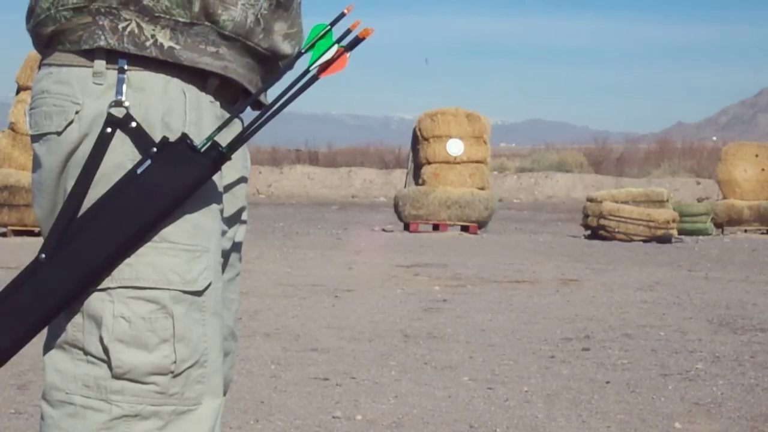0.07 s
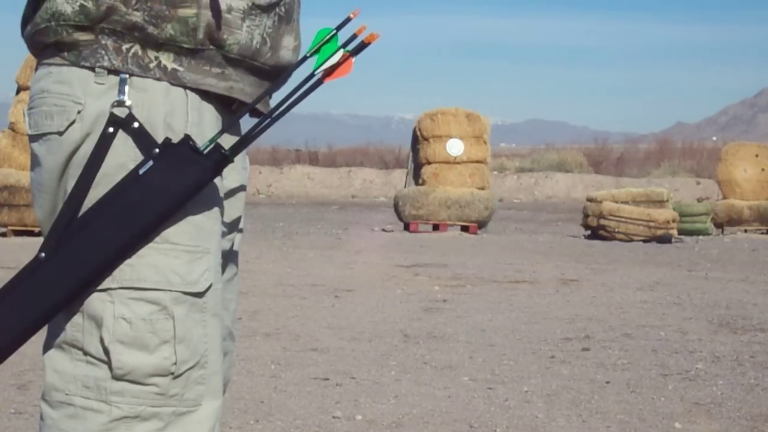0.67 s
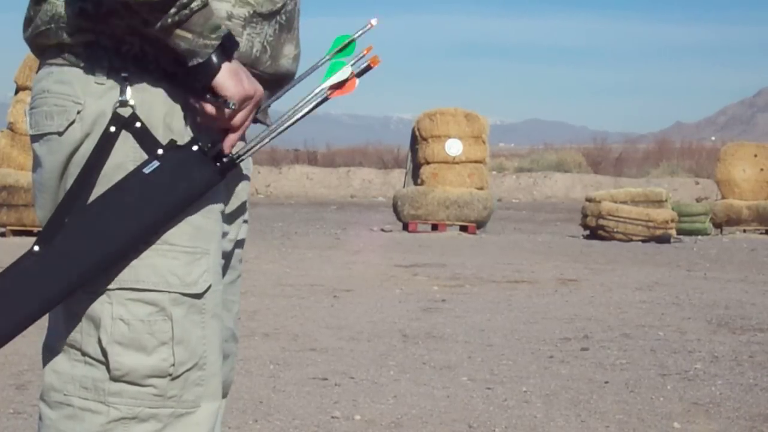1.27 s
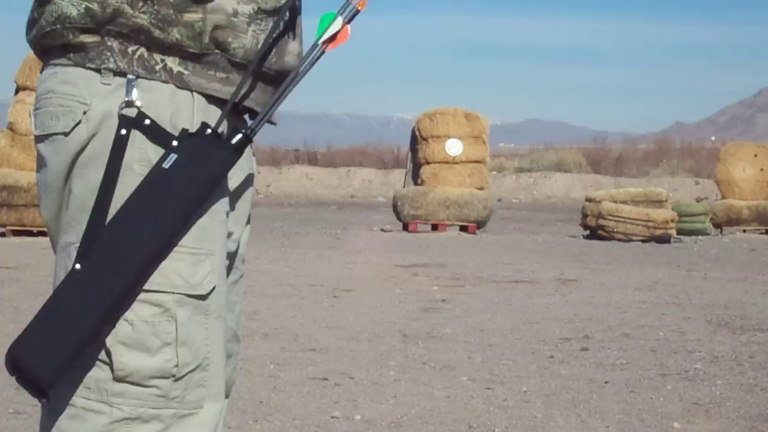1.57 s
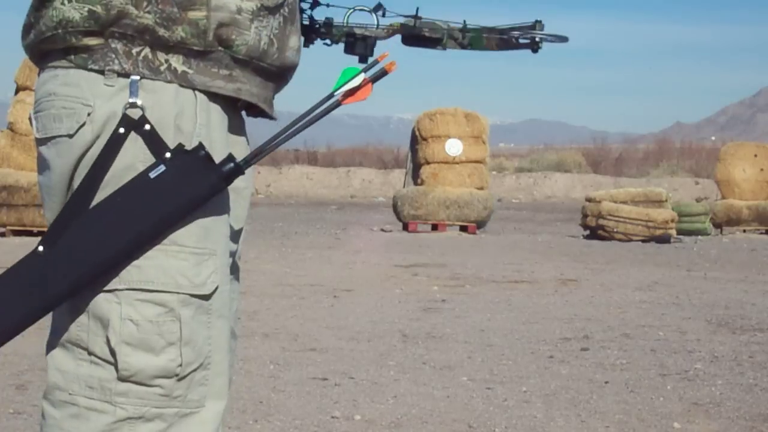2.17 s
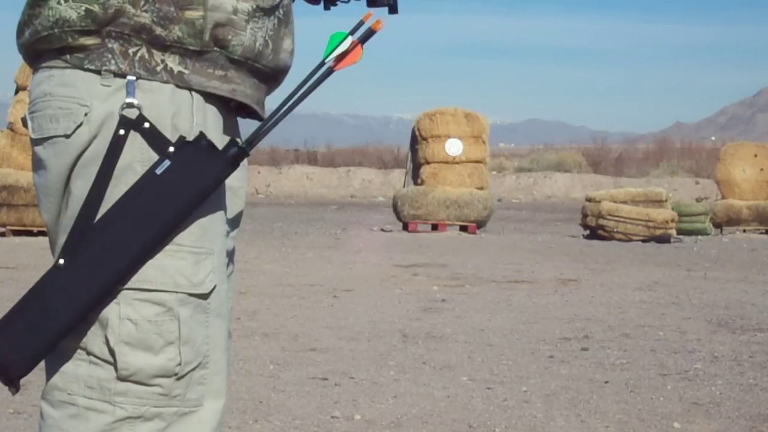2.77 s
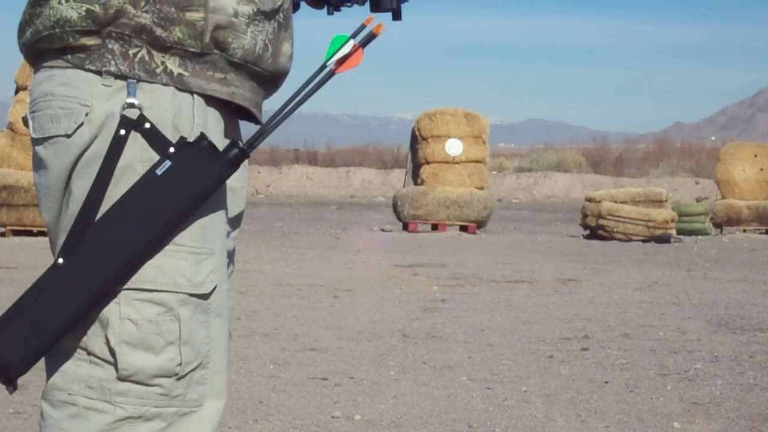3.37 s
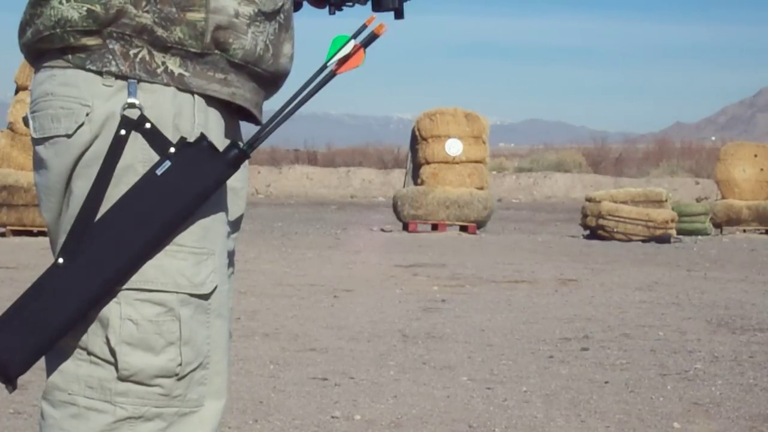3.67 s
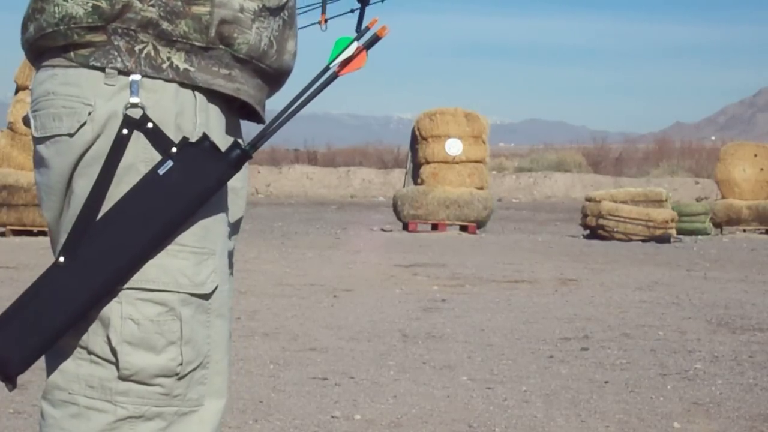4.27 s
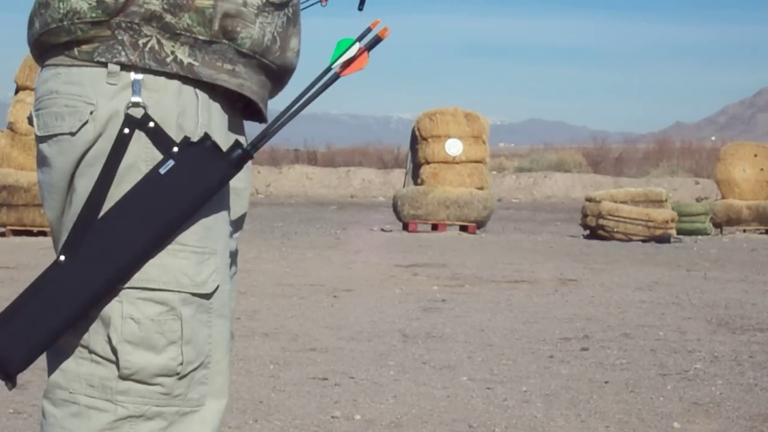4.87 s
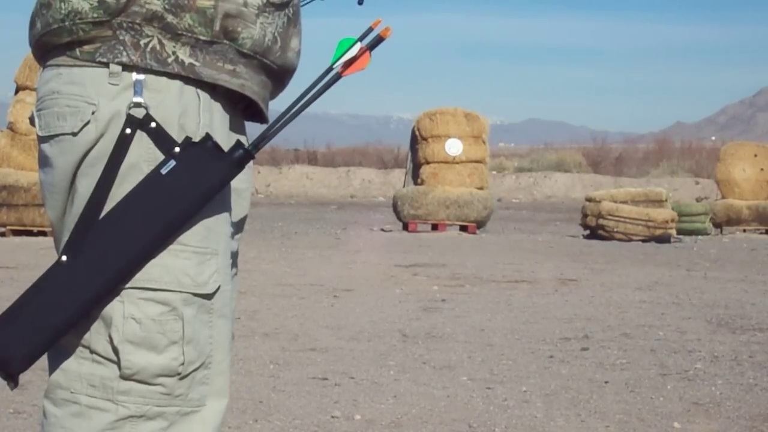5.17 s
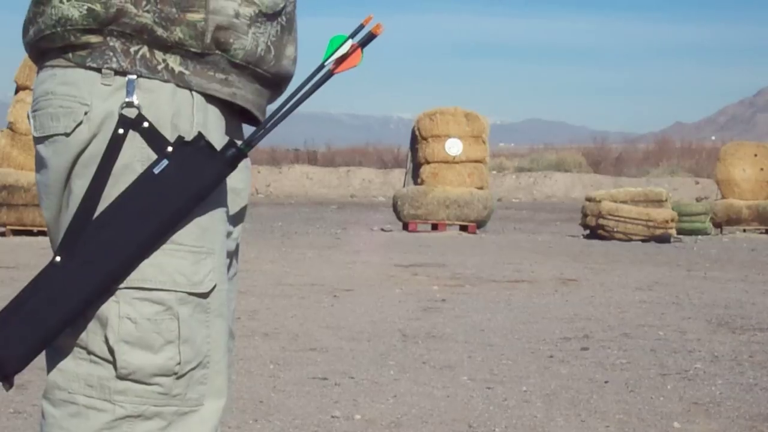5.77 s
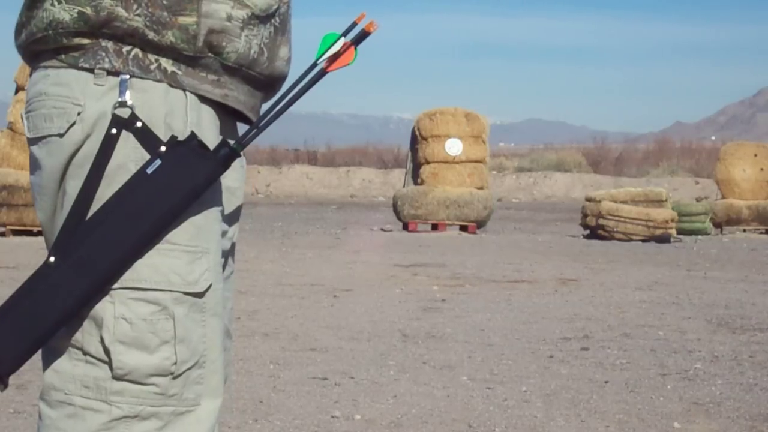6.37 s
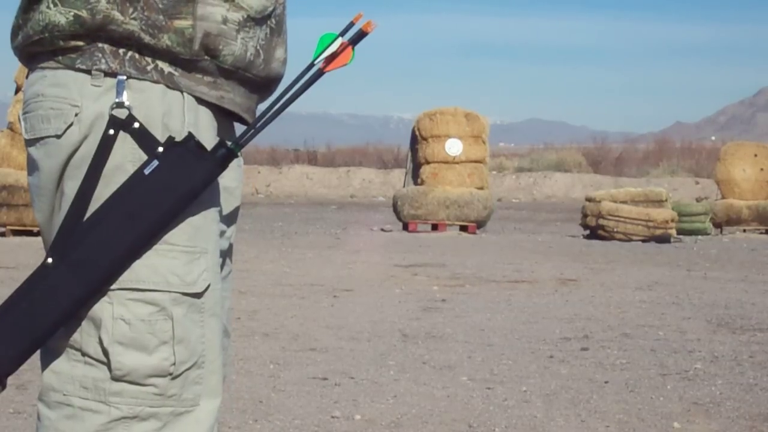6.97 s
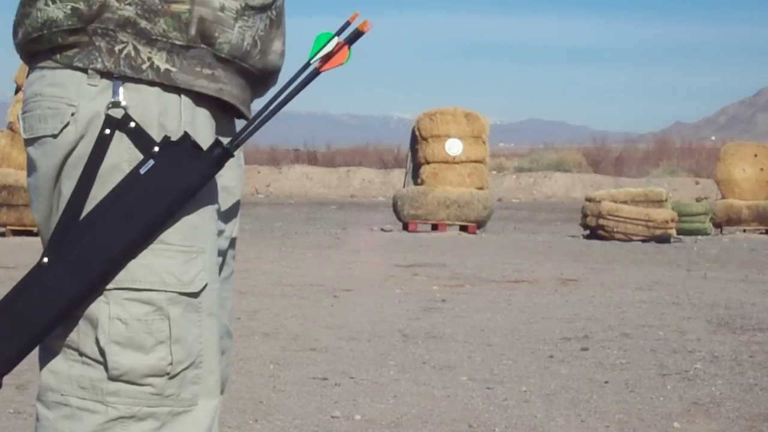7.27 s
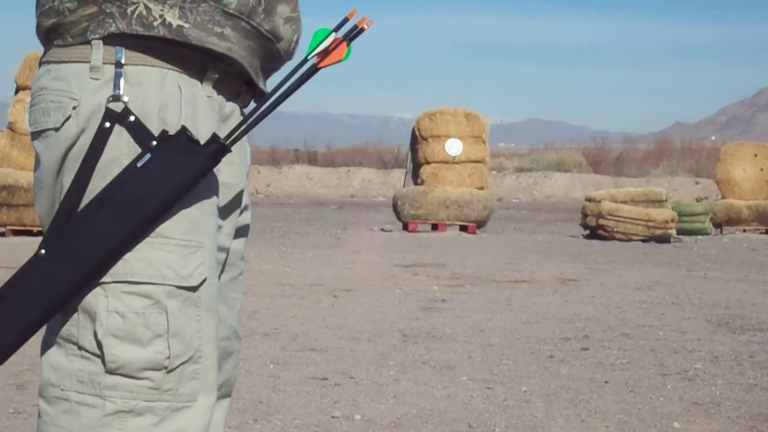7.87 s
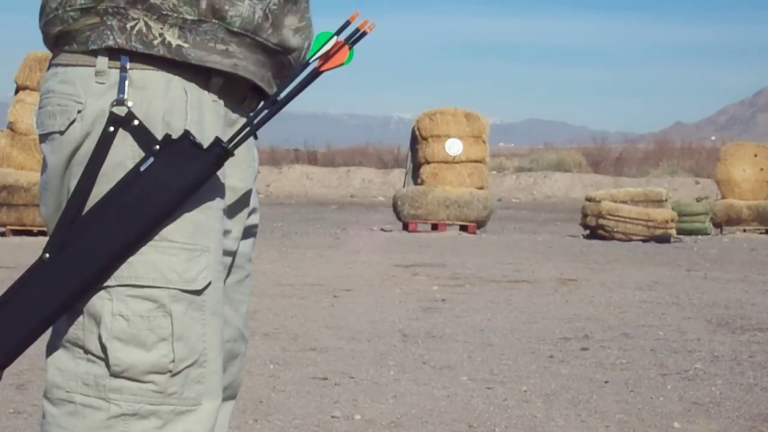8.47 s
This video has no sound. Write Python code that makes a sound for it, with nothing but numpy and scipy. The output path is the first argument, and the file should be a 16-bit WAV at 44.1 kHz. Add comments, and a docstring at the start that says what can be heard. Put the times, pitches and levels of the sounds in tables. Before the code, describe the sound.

Outdoor wind rumbles on the microphone throughout, stronger on the left, with hollow gusts, a faint whistle and a light hiss. At 0.4 seconds a catch snaps shut close by, slightly to the right: one sharp crack, the loudest sound. Two faint cloth swishes come around 1 second. From 1.3 to 1.7 seconds an arrow slides out of a quiver with a soft scrape and tiny squeaks. The other shafts clack brightly together at 1.7 seconds and settle with a couple of lighter knocks. At 4 seconds there is a small, bright plastic click as the arrow is clipped onto the bowstring, followed by fainter scattered ticks until about 5 seconds. Wind buffets the microphone with low thumps around 4 to 4.4 and 5 to 5.5 seconds. After that only wind remains, bumping near 7 seconds and gusting at about 7.5 and 8.3 seconds.

```python
"""An open, windy archery range. A piece of gear snaps shut, then an arrow is drawn from a hip quiver:
it scrapes past the other arrows and lets them clack together. Small ticks follow as it is nocked
(clipped onto the bowstring). All along, the wind rumbles, rushes hollowly in gusts and buffets the
microphone's two openings (ports), mainly the left one."""
import sys
import numpy as np
from scipy import signal
from scipy.fft import rfft, irfft, next_fast_len
from scipy.io import wavfile
from scipy.ndimage import uniform_filter1d, map_coordinates

SR = 44100
rng = np.random.default_rng(int(sys.argv[2]) if len(sys.argv) > 2 else 0)


def int16_out(signal):
    """Quantize to a 16-bit WAV file."""
    q = np.round(np.clip(np.atleast_2d(signal).T, -1, 1) * 32767)
    wavfile.write(sys.argv[1], SR, q.astype(np.int16))


N = 376173
TOP_HZ = 8750  # the highest frequency the microphone passes
# the low roar of moving air: f/Hz, level/dB
ROAR_SPECTRUM = [(50, -33.5), (90, -1.5), (150, 2), (210, 0.5), (260, -1), (330, -6.5), (400, -13.5),
                 (550, -16.5), (900, -49.5), (1500, -90.5)]


def amp(db):
    """Turn decibels into a gain to multiply by."""
    return 10 ** (np.asarray(db) / 20)


def unit(x):
    """Scale a signal to an average strength (rms) of 1."""
    return x / np.sqrt(np.mean(x ** 2) + 1e-20)


def energy_one(x):
    """Scale a short sound to a total energy of 1."""
    return x / np.linalg.norm(x)


def along(points, hz):
    """Read between (frequency, value) points, on a log frequency axis."""
    freqs, values = np.transpose(points)
    return np.interp(np.log(hz + 1), np.log(freqs + 1), values)


def curve(points):
    """Join (time, value) points with straight lines, one value per sample."""
    return np.interp(np.arange(N) / SR, *np.transpose(points))


def wobble(rate):
    """A smooth random curve through `rate` new values a second."""
    values = rng.standard_normal(int(N * rate / SR) + 4)
    return map_coordinates(values, [np.arange(N) * rate / SR])


def swell(s, length):
    """A smooth rise and fall around time s, down to about a third at the ends of its length."""
    distance = 2 * (np.arange(N) / SR - s) / length
    return np.exp(-np.minimum(distance ** 2, 50))


def filtered(x, response):
    """Give each frequency in x the gain response(hz)."""
    size = x.shape[-1]
    padded = next_fast_len(size + 8192)
    return irfft(rfft(x, padded) * response(np.fft.rfftfreq(padded, 1 / SR)), padded)[..., :size]


def coloured(x, spectrum):
    """Shape x with a spectrum (a level for each frequency), then scale it to rms 1."""
    return unit(filtered(x, lambda hz: amp(along(spectrum, hz))))


def pair(apart_db):
    """Left and right white noise: a shared part, plus a difference at apart_db against it."""
    mid, side = rng.standard_normal((2, N))
    return unit(np.array([mid + amp(apart_db) * side, mid - amp(apart_db) * side]))


def panned(lead_db):
    """Left and right gains that average 1, the left louder by lead_db."""
    gains = amp(np.array([[.5], [-.5]]) * lead_db)
    return gains / gains.mean(axis=0)


def add(track, s, sound):
    """Mix a sound into the track at s seconds."""
    part = track[round(s * SR):][:len(sound)]
    part += sound[:len(part)]


def pulse(spectrum, size=2048):
    """The sharpest click with this spectrum, cut off at TOP_HZ, with a peak of 1."""
    cepstrum = irfft(np.log(amp(along(spectrum, np.fft.rfftfreq(size, 1 / SR)))))
    # folding the second half onto the first packs the energy at the start
    cepstrum[1:size // 2] *= 2
    cepstrum[size // 2 + 1:] = 0
    wave = filtered(irfft(np.exp(rfft(cepstrum))), lambda hz: hz < TOP_HZ)
    return wave / np.abs(wave).max()


def ringing(modes):
    """A struck object's tones, each at a slightly random strength; t60 is the time to fade by 60 dB."""
    t = np.arange(SR // 5) / SR
    return sum(amp(db + rng.standard_normal() - 60 * t / t60)
               * np.sin(2 * np.pi * (hz * t + rng.random())) for hz, db, t60 in modes)


def burst(t60):
    """A dying puff of noise."""
    t = np.arange(SR // 5) / SR
    spectrum = [(400, -19), (1500, -6), (8000, -18.5), (10000, -33.5)]  # f/Hz, level/dB
    return amp(-60 * t / t60) * coloured(rng.standard_normal(len(t)), spectrum)


def outdoors(x, wet_db):
    """Sound arrives directly, and also scatters briefly off the archer's body and the gravel."""
    # how fast the scatter fades: f/Hz, t60/s
    fade_times = [(300, 0.11), (2500, 0.062), (8000, 0.047)]
    hz, t, bands = signal.stft(rng.standard_normal((2, SR // 5)), SR, nperseg=128)
    tail = signal.istft(bands * amp(-60 * t / along(fade_times, hz)[:, None]), SR, nperseg=128)[1]
    scatter = signal.fftconvolve(x[None], tail / np.linalg.norm(tail[0]), axes=1)[:, :N]
    return x + amp(wet_db) * scatter


def patchy(x, depth_db):
    """Swirling air makes small ranges of pitch louder or softer for a moment."""
    bands = signal.stft(x, nperseg=2048)[2]
    patches = uniform_filter1d(rng.standard_normal(bands.shape[1:]), size=4, axis=0)  # across pitch
    patches = uniform_filter1d(patches, size=9, axis=1)  # across time
    return unit(signal.istft(bands * amp(depth_db * unit(patches)), nperseg=2048)[1][:, :N])


def rushing():
    """Air streams past: each gust lifts a low roar, a hollow rush and a whistle over a steady hiss."""
    # passing gusts: peak t/s, relative level/dB, length/s, whistle against gust/dB
    gusts = [(0.445, -45, 1.32, -8.5), (1.087, -45.5, 0.7, -11.5), (1.558, -41, 0.56, -11),
             (2.2, -52.5, 0.37, -8), (3.122, -46.5, 0.66, -8), (3.73, -49, 0.46, -8),
             (4.748, -53, 1.1, -2.5), (5.32, -55, 0.55, 0), (6.144, -55.5, 0.26, 0),
             (6.59, -51, 0.15, -2.5), (7.583, -43.5, 0.75, -3.5), (8.323, -40, 0.6, -12)]
    # the roar's slow rise and fall: t/s, relative level/dB
    roar_levels = [(0.0, -42), (0.47, -39), (0.73, -42.5), (1.4, -39), (2.75, -45.5), (3.44, -42),
                   (3.59, -41.5), (4.13, -43.5), (4.37, -42), (4.75, -37.5), (5.25, -42), (5.56, -48),
                   (6.27, -47), (6.56, -41), (7.27, -46.5), (7.55, -37), (7.89, -45.5), (8.53, -37)]
    # the wind's three higher sounds: f/Hz, level/dB
    hollow_spectrum = [(90, -19.5), (170, 1.5), (300, 1), (390, 2), (460, 0.5), (540, -4.5), (660, 0.5),
                       (730, -1), (800, -1), (900, -6), (1100, -20), (1450, -32.5), (4000, -59)]
    whistle_spectrum = [(600, -39.5), (780, -14), (880, -1.5), (1030, 1.5), (1090, -3), (1160, -8.5),
                        (1400, -19), (2000, -44.5), (4000, -72.5)]
    hiss_spectrum = [(100, -3), (900, 10.5), (1500, 12.5), (2200, 5), (3500, 1.5), (6000, -2.5), (8000, -3)]
    gust_power, whistle_power = 0, amp(-59) ** 2  # a faint whistle stays between gusts
    for s, db, length, whistle_db in gusts:
        gust = amp(db) * swell(s, length) ** 2
        gust_power += gust ** 2
        whistle_power += (amp(whistle_db) * gust) ** 2
    gust_gain = np.sqrt(gust_power)
    roar_gain = np.hypot(amp(curve(roar_levels) + 1), amp(-3) * gust_gain)
    roar = roar_gain * coloured(pair(apart_db=-19.5), ROAR_SPECTRUM)
    hollow_gain = np.hypot(amp(-53), gust_gain) * amp(2.5 + 0.57 * wobble(14))
    hollow = hollow_gain * patchy(coloured(pair(apart_db=-15.5), hollow_spectrum), depth_db=2.5)
    whistle = patchy(coloured(pair(apart_db=-10.5), whistle_spectrum), depth_db=2.6)
    whistle *= np.sqrt(whistle_power)
    hiss = amp(-62) * coloured(pair(apart_db=-1.5), hiss_spectrum)
    return roar * panned(1) + (hollow + whistle) * panned(-.5) + hiss * panned(0.93)


def buffeting():
    """A breeze rumbles on the ports; swirls of air hit them unequally, and harder hits fizz more."""
    # swirls hitting the ports: peak t/s, level/dB, length/s, left minus right/dB
    buffets = [(2.3, -36, 0.044, 12), (2.543, -31.5, .11, 16), (3.01, -38, .08, 14), (4.064, -26, 0.22, 7),
               (4.223, -29, .22, 23), (4.412, -33.5, 0.043, 16), (5.1, -28.5, 0.15, 16),
               (5.192, -31.5, 0.18, 2.5), (5.369, -25.5, 0.13, 2.5), (5.453, -29, .1, 5),
               (5.543, -35, .12, -6), (5.71, -36.5, 0.089, -5), (6.244, -36, 0.1, -12),
               (6.915, -29, 0.094, 16), (7.485, -31.5, 0.16, 11), (7.975, -32, 0.046, 18)]
    # the wind's deep rumble and fine crackle: f/Hz, level/dB
    rumble_spectrum = [(12, -32.5), (22, -3.5), (40, -2), (58, 2.5), (75, -0.5), (110, -2), (160, -9),
                       (230, -21), (300, -24), (400, -29), (600, -39.5), (1100, -48), (1600, -55.5),
                       (3000, -100)]
    fizz_spectrum = [(600, -1), (1500, -1.5), (3000, -1.5), (5000, 0.94), (8000, -1.1)]
    breeze = amp(-36.5 + 1.36 * wobble(11)) * panned(6.5)
    blows = np.sqrt(sum((amp(db) * panned(lead_db)) ** 2 * swell(s, length) ** 4
                        for s, db, length, lead_db in buffets))
    shared = coloured(rng.standard_normal(N), rumble_spectrum)
    swirls = shared + amp(-3.5) * coloured(rng.standard_normal((2, N)), rumble_spectrum)
    rumble = breeze * unit(np.tanh(swirls * 0.25))  # hard pressure swings level off
    # a buffet is local, so each port gets its own noise
    local_rumble = coloured(rng.standard_normal((2, N)), rumble_spectrum)
    local_roar = amp(-10) * coloured(rng.standard_normal((2, N)), ROAR_SPECTRUM)
    flutter = amp(4 * np.array([wobble(300), wobble(300)]))
    fizz = coloured(rng.standard_normal((2, N)) * flutter, fizz_spectrum)
    force = np.hypot(breeze, blows)
    fizz_gain = amp(-62.5) * (force / amp(-29)) ** 1.1  # grows faster than the force
    return rumble + blows * (local_rumble + local_roar) + fizz_gain * fizz


def thumps():
    """A single swirl of air breaks on the ports: one pull and one push of pressure."""
    # breaking swirls: t/s, relative level/dB, centre f/Hz, left minus right/dB
    swirls = [(2.53, -23, 108, 13), (4.013, -14, 250, 29), (4.063, -17.5, 190, -6), (4.095, -19, 234, 12),
              (4.173, -21, 197, 21), (4.226, -25, 130, 14), (5.364, -17.5, 229, 4), (6.914, -20, 64, 19)]
    track, t = np.zeros((2, N)), np.arange(SR // 10) / SR
    for s, db, hz, lead_db in swirls:
        phase = 2 * np.pi * hz * t - np.pi
        pressure = amp(db) * phase * np.exp(-phase ** 2 / 2)
        for port, gain in zip(track, panned(lead_db)):
            add(port, s, gain * pressure)
    return filtered(track, lambda hz: 1 / (1 + (hz / 370) ** 8))  # keep only the lows


def rustles():
    """Two soft cloth swishes, then a faint crackle of wind on the microphone."""
    # the two swishes and the wind crackle: peak t/s, level/dB, length/s
    puffs = [(0.967, -59.5, 0.072), (1.094, -59, 0.07), (2.55, -70.5, 0.072)]
    spectrum = [(700, -10), (1700, 2), (4500, -6.5), (8000, -12), (10000, -39)]  # f/Hz, level/dB
    track = np.zeros(N)
    for s, db, length in puffs:
        fade = np.hanning(int(length * SR))
        noise = coloured(rng.standard_normal(len(fade)), spectrum)
        add(track, s - length / 2, amp(db) * fade * noise)
    return track


def snap():
    """A catch snaps shut: one sharp crack, two quick rebounds and a short ring."""
    # the crack: f/Hz, level/dB
    crack_spectrum = [(120, -12), (400, 3), (800, 5.5), (1500, 4.5), (2300, -1.5), (2850, 2.5), (3400, 2),
                      (3800, 1.5), (4500, 1), (5000, -14), (5600, -11.5), (7500, -15), (8800, -12)]
    # the tones the gear rings with: f/Hz, relative level/dB, t60/s
    gear_tones = [(740, -1, 0.097), (1320, 1.5, 0.036), (1440, -20, 0.039), (1620, -2, 0.029),
                  (1900, 5, 0.019), (2090, 0, 0.036), (2690, -11, .04), (3700, -11, 0.027),
                  (4480, 1, 0.022), (6060, -21, 0.055), (7060, -17, 0.055)]
    track, crack = np.zeros(N), pulse(crack_spectrum)
    add(track, 0.4, -amp(-6.5) * crack)
    add(track, 0.40022, amp(-13) * crack)
    add(track, 0.4009, amp(-13) * crack)
    add(track, 0.4004, amp(-32) * ringing(gear_tones))
    return track


def nocking():
    """Small plastic parts tick: a rough, brief contact sets off a bright click and a lower knock."""
    # ticks of the arrow's notched end, the string and the arrow rest:
    # t/s, relative level/dB, click f/Hz, knock f/Hz, relative knock level/dB, knock t60/s
    ticks = [(4.007, -43, 7600, 1050, 3, .02), (4.0097, -27.5, 7250, 2070, -14, 0.012),
             (4.011, -33.5, 4150, 3220, -9, .005), (4.228, -44.5, 6300, 4150, -0.5, 0.007),
             (4.488, -41, 5300, 3170, 4, 0.0053), (4.6942, -39, 5870, 4500, -5.5, 0.007),
             (4.736, -44, 5500, 2400, -4, 0.007), (4.9353, -43, 7200, 2480, -1, 0.024),
             (4.938, -38.5, 4000, 1730, 0, .035), (5.0513, -39, 7000, 2270, 1, 0.0061)]
    track = np.zeros(N)
    for s, db, click_hz, knock_hz, knock_db, t60 in ticks:
        ring = ringing([(click_hz, 0, .0018), (knock_hz, knock_db + 1, t60)])
        contact = energy_one(ring) + amp(-4) * energy_one(burst(t60=0.016))
        add(track, s, amp(db + 13) * contact)
    return track


def shaft_ring(pitch):
    """A rubbed shaft rings in narrow bands of noise that glide as the rubbing point moves along it."""
    # the bands at a pitch ratio of 1: f/Hz, width/Hz, level/dB
    bands = [(1984, 500, 5.5), (2770, 420, -11), (3750, 640, 1)]
    turns = 2 * np.pi * np.cumsum(pitch) / SR
    return unit(sum(amp(db) * (wobble(width) * np.sin(hz * turns) + wobble(width) * np.cos(hz * turns))
                    for hz, width, db in bands))


def drawing():
    """The arrow slides out in tiny slips and squeaks as its tip nears the rim; the others settle."""
    # the shaft rubbing on the quiver's sleeve: t/s, level/dB
    slide_levels = [(1.28, -73), (1.354, -56.5), (1.38, -69), (1.386, -58), (1.506, -52), (1.514, -65),
                    (1.572, -53.5), (1.644, -80), (1.66, -68)]
    # the sleeve's weave catching the shaft: f/Hz, level/dB
    scrape_spectrum = [(700, -23), (1400, 6), (2000, 3), (2700, 4.5), (3900, -4), (4700, -6), (6500, -12.5),
                       (8500, -11)]
    # the shaft's squeaks: t/s, level/dB, start f/Hz, end f/Hz, length/s
    squeaks = [(1.494, -52, 1870, 2100, 0.017), (1.552, -49, 2900, 2380, 0.018),
               (1.555, -49.5, 3440, 2930, 0.019), (1.569, -47, 2640, 2280, 0.013),
               (1.571, -55, 3680, 3900, 0.0094)]
    fall_octaves_per_s, catches_per_s, settle_pitch = .9, 2000, 1.15
    t, start, end = np.arange(N) / SR, slide_levels[0][0], slide_levels[-1][0]
    slide_pitch = 1.08 * 2 ** (-fall_octaves_per_s * np.maximum(t - start, 0))
    pitch = np.where(t < end, slide_pitch, settle_pitch)
    catches = (rng.random(N) < catches_per_s / SR) * rng.standard_normal(N)
    rub = shaft_ring(pitch) + amp(3.5) * coloured(catches, scrape_spectrum)
    slips = amp(3 * wobble(350))
    sliding = ((t > start) & (t < end)) * amp(curve(slide_levels))
    settling = amp(-49) * swell(1.741, length=.045) ** 2
    track = (sliding + settling) * unit(rub * slips)
    for s, db, start_hz, end_hz, length in squeaks:
        hz = np.linspace(start_hz, end_hz, int(length * SR))
        add(track, s, amp(db) * np.hanning(len(hz)) * np.sin(2 * np.pi * np.cumsum(hz) / SR))
    return track


def clacking():
    """Arrows knock together and chatter; each bounce is weaker and rings at its own pitch."""
    # knocks between shafts: t/s, relative level/dB, brightness/(dB per octave), pitch ratio
    clacks = [(0.5172, -41.5, -19, 0.84), (0.6345, -50.5, 5, 1.04), (1.3196, -52, -16, 1.2),
              (1.4048, -54, -13, 0.87), (1.533, -46, -5, 0.6), (1.573, -46.5, 3, 1.1),
              (1.6891, -21.5, 5.5, 1), (1.7745, -41, -4, 1.04), (1.8285, -38, -5.5, 0.69)]
    # a shaft's tones at a pitch ratio of 1: f/Hz, relative level/dB, t60/s
    shaft_tones = [(1670, -8, 0.018), (2093, -9.5, .06), (2590, -13, .04), (3520, 6, 0.019),
                   (3900, -10, 0.024), (4180, -3, .03), (4670, -6, .03), (5420, 0, 0.022),
                   (6230, -16, 0.019), (6960, -7.5, 0.022), (7270, -14.5, 0.015), (8100, -15.5, 0.028)]
    first_gap_s, bounce_loss_db, pitch_scatter = .0062, 8, .09
    track = np.zeros(N)
    for s, db, tilt_db, pitch in clacks:
        for bounce in range(5):
            ratio = pitch * (1 + pitch_scatter * min(bounce, 1) * rng.standard_normal())
            ring = ringing([(hz * ratio, level + tilt_db * np.log2(hz / 3500), t60)
                            for hz, level, t60 in shaft_tones])
            contact = energy_one(ring) + amp(-6) * energy_one(burst(t60=.028))
            delay = first_gap_s * bounce ** 2  # the gaps widen
            add(track, s + delay, amp(db + 11.5 - bounce_loss_db * bounce) * contact)
    return track


def scene():
    """The archer's gear sounds close by, a little to the right, in the wind."""
    gear = outdoors(snap(), wet_db=-12) * panned(-3.5)
    gear += outdoors(clacking() + drawing() + rustles(), wet_db=-4) * panned(-0.91)
    gear += outdoors(nocking(), wet_db=-6.5) * panned(-.4)
    return gear + buffeting() + thumps() + rushing()


def record(dry):
    """The microphone softens the highest treble and cuts off steeply above TOP_HZ."""
    treble_gains = [(7500, 0.5), (8100, -5), (8700, -18.5)]  # f/Hz, level/dB
    soft = filtered(dry, lambda hz: amp(along(treble_gains, hz)))
    return filtered(soft, lambda hz: 1 / (1 + np.minimum(hz / TOP_HZ, 2) ** 100))


dry = scene()
out = record(dry)
int16_out(out)
```